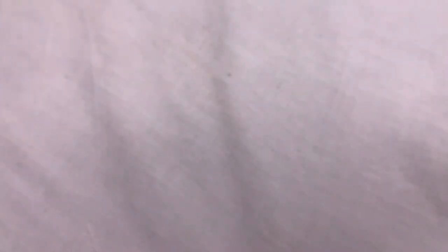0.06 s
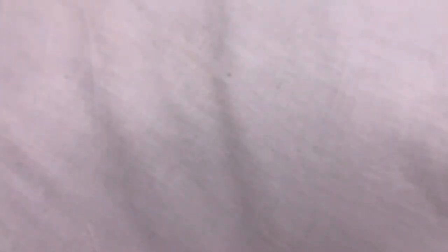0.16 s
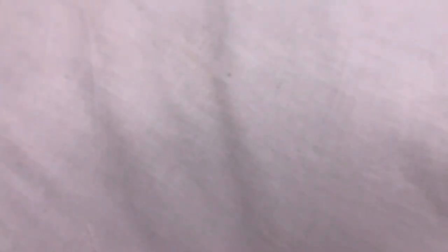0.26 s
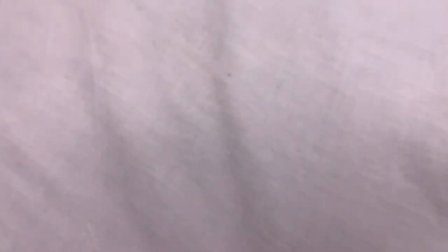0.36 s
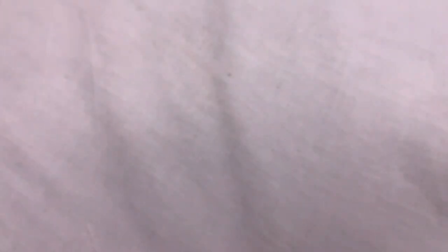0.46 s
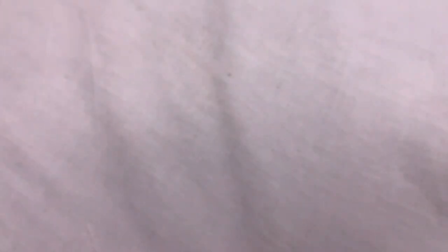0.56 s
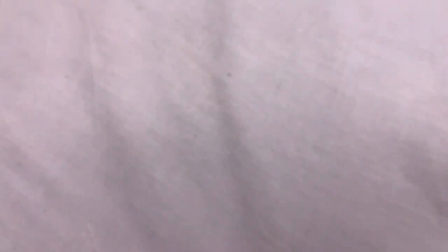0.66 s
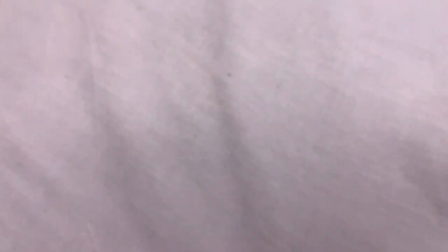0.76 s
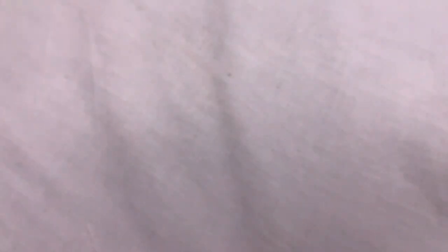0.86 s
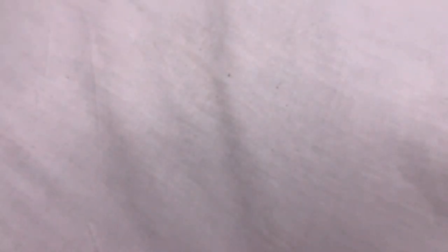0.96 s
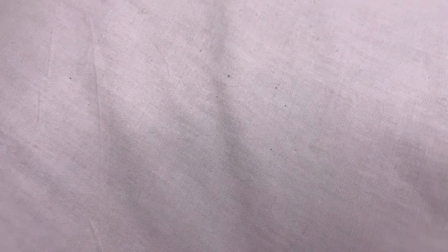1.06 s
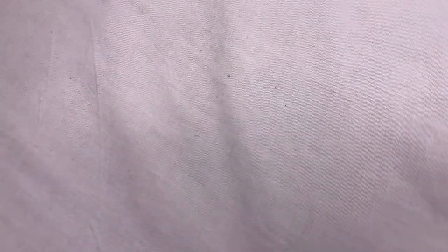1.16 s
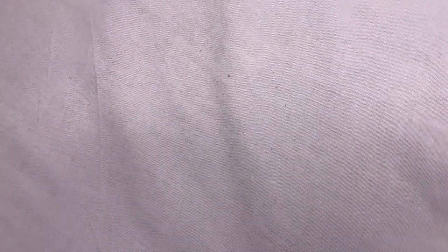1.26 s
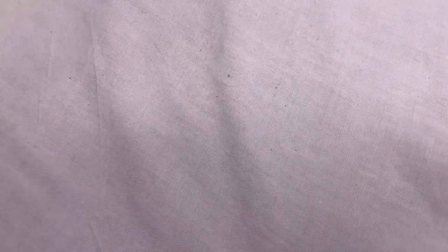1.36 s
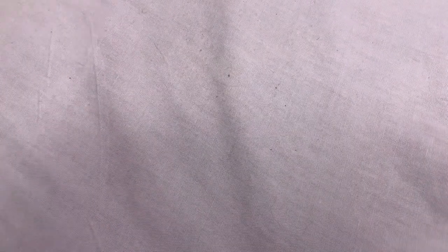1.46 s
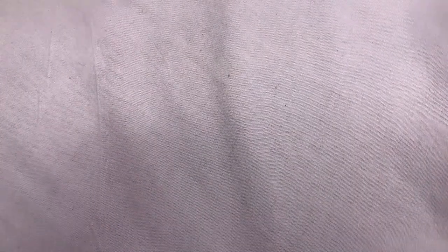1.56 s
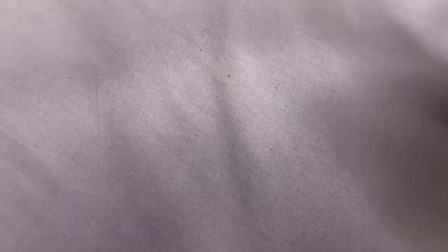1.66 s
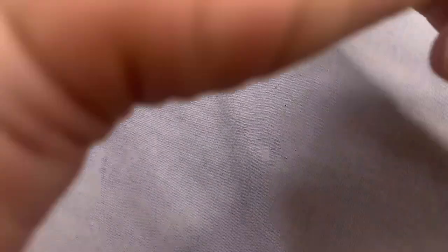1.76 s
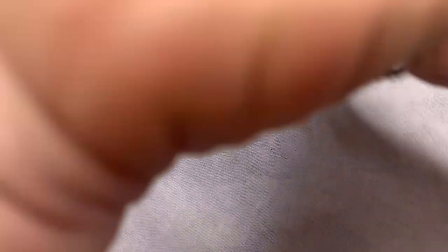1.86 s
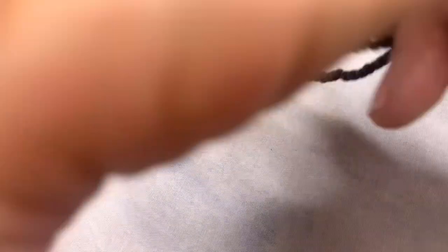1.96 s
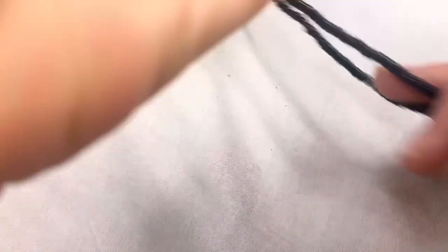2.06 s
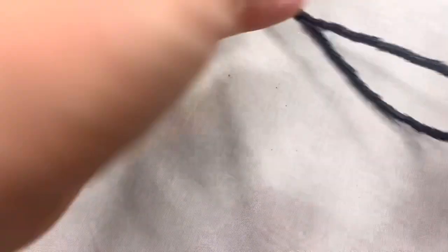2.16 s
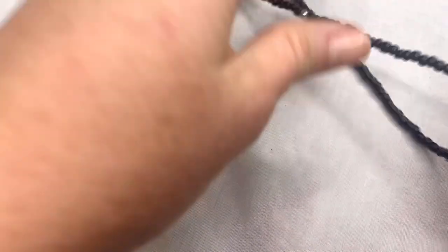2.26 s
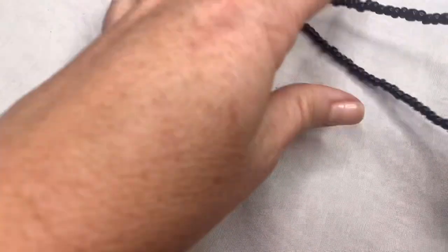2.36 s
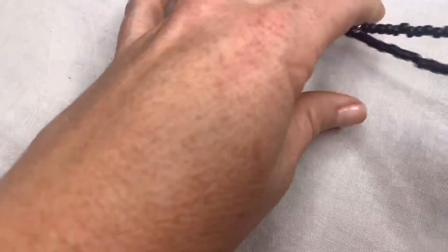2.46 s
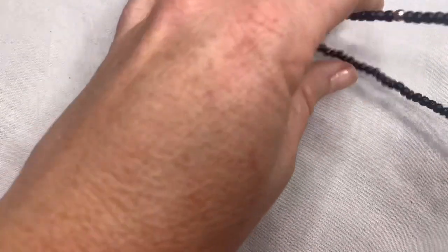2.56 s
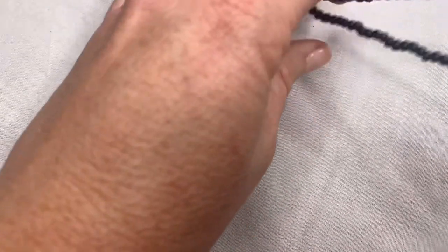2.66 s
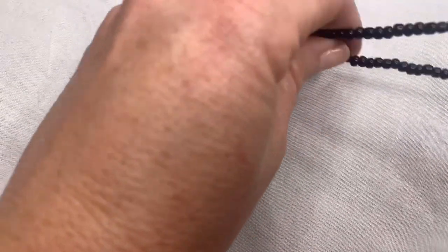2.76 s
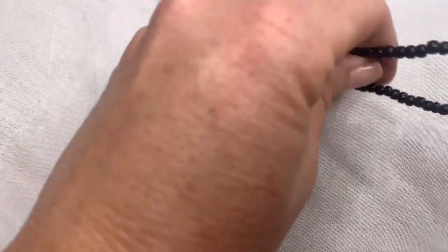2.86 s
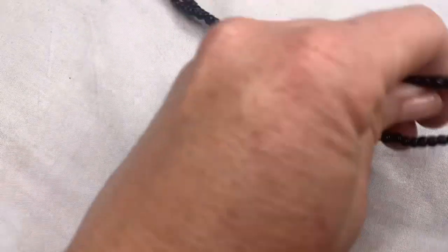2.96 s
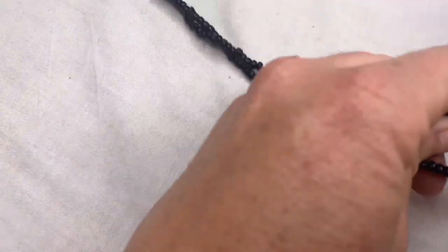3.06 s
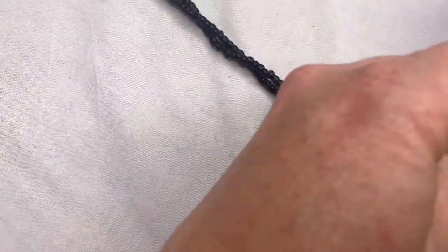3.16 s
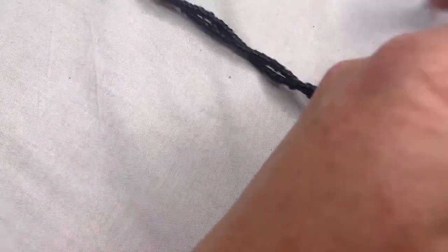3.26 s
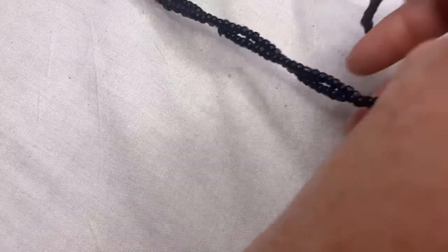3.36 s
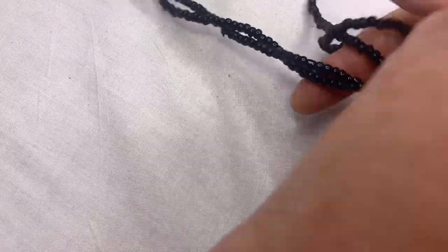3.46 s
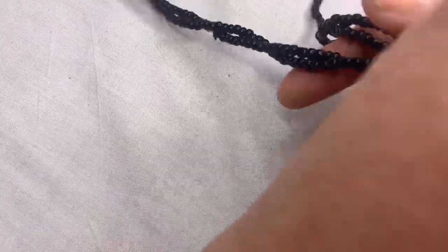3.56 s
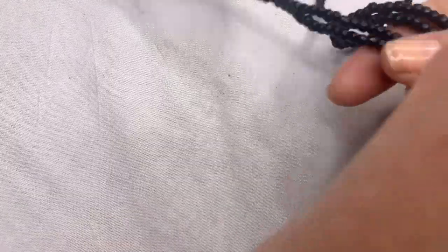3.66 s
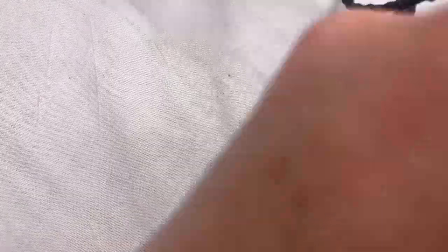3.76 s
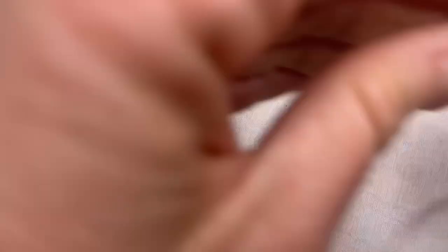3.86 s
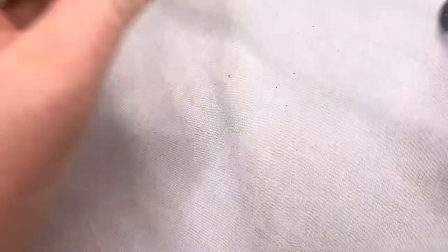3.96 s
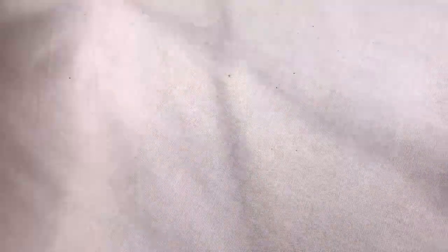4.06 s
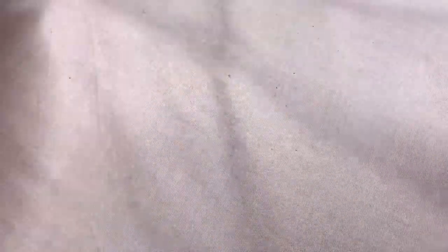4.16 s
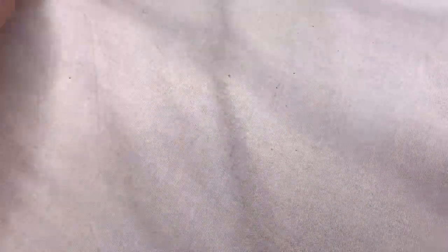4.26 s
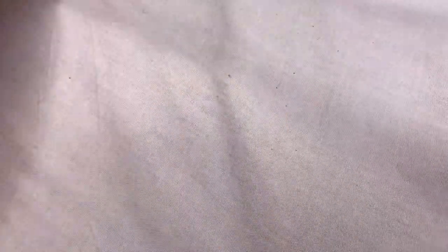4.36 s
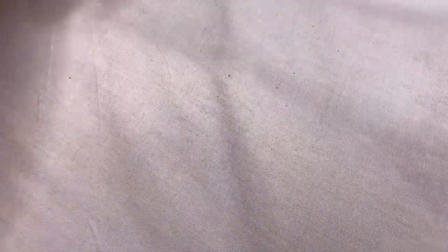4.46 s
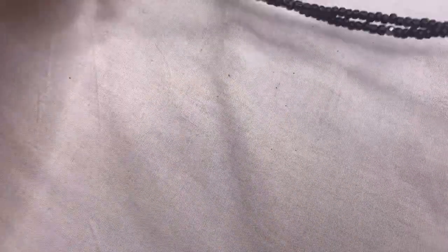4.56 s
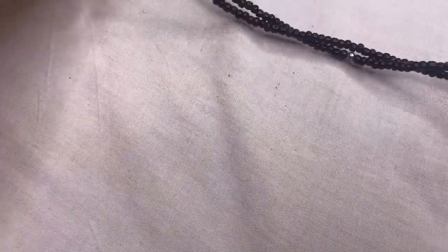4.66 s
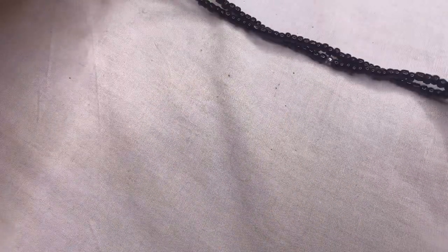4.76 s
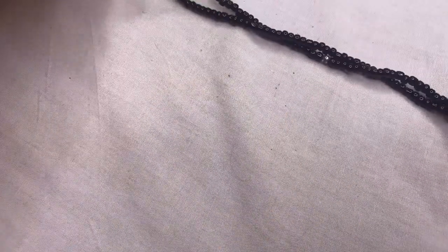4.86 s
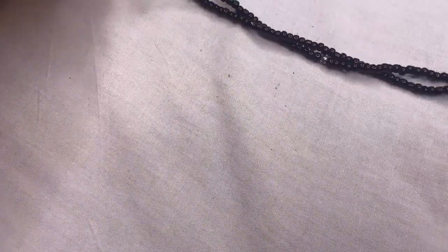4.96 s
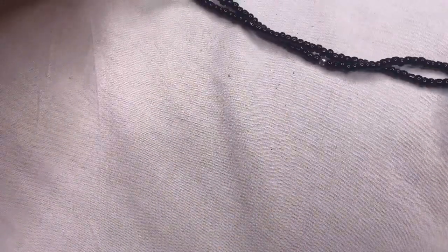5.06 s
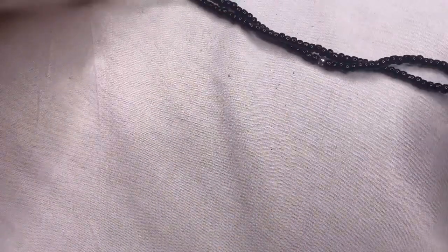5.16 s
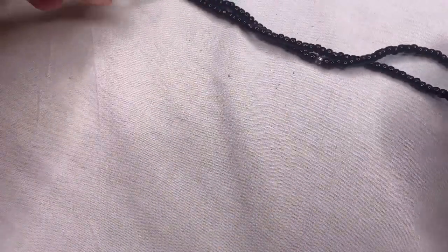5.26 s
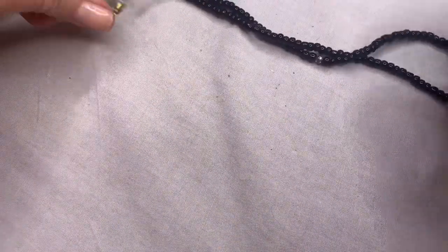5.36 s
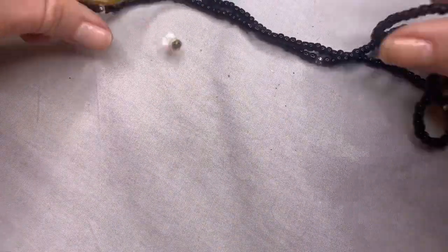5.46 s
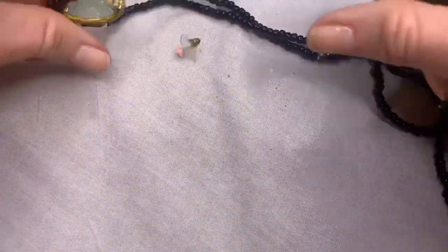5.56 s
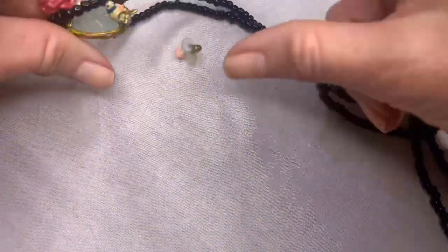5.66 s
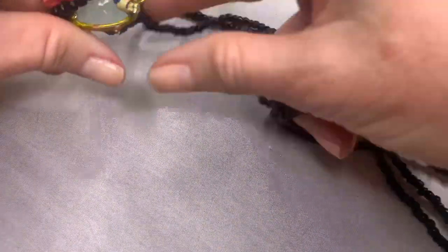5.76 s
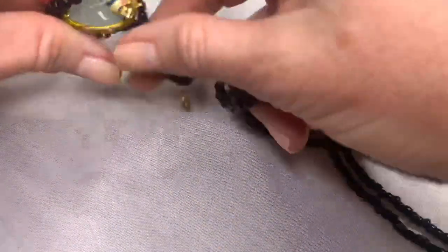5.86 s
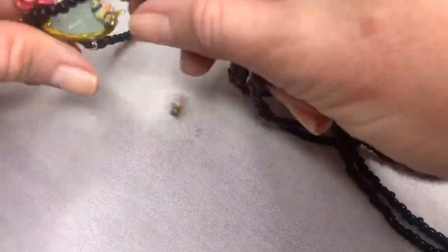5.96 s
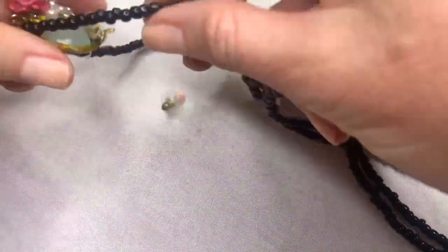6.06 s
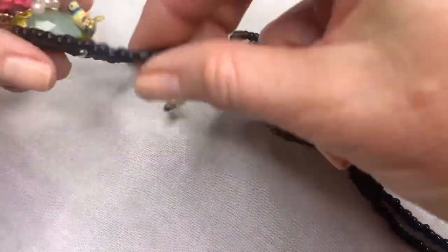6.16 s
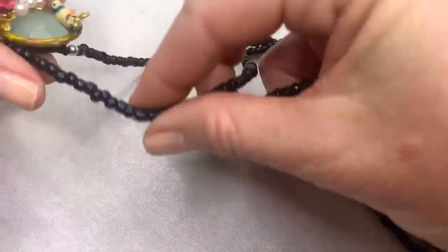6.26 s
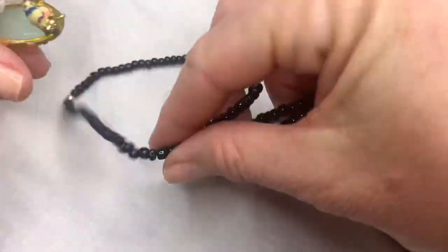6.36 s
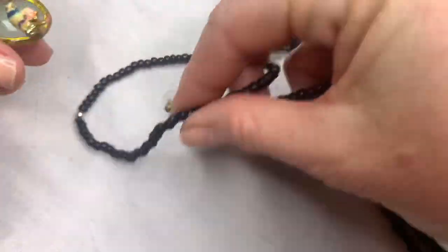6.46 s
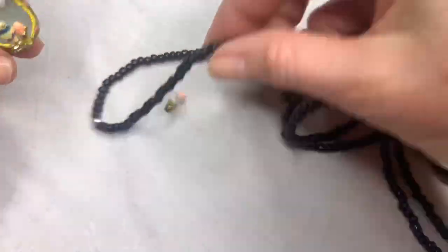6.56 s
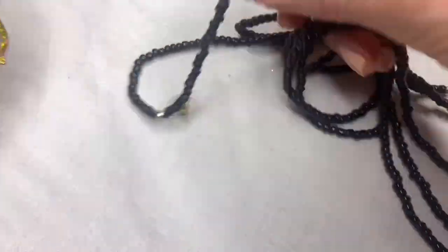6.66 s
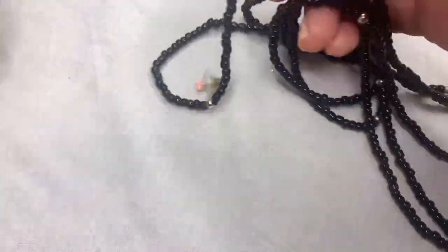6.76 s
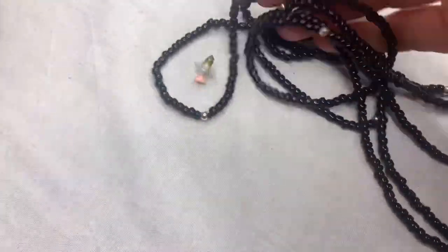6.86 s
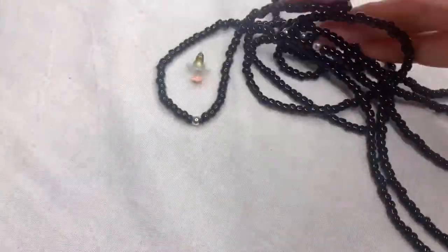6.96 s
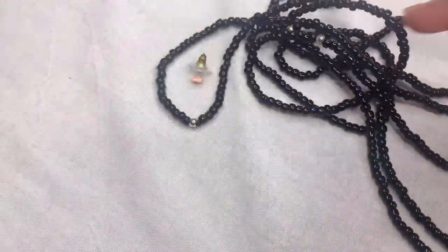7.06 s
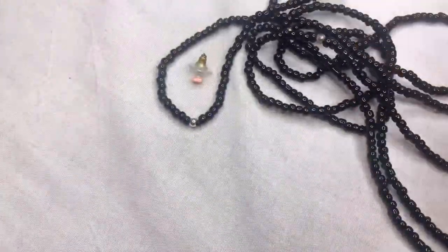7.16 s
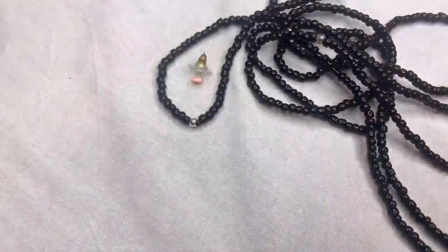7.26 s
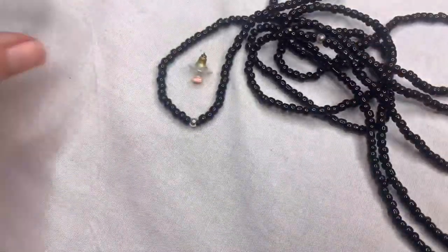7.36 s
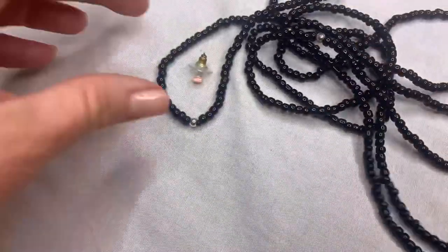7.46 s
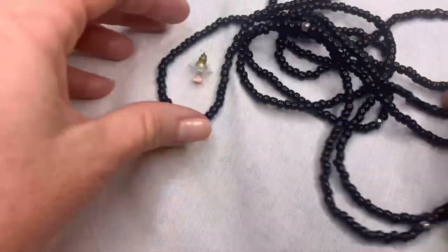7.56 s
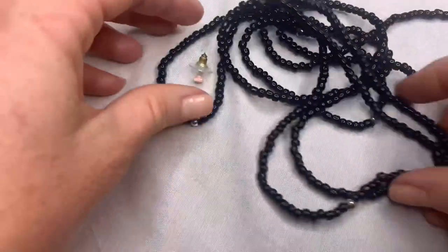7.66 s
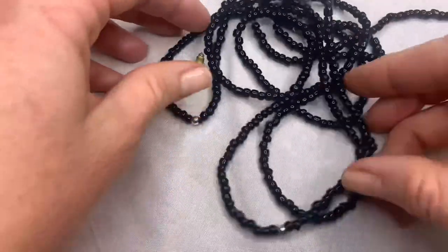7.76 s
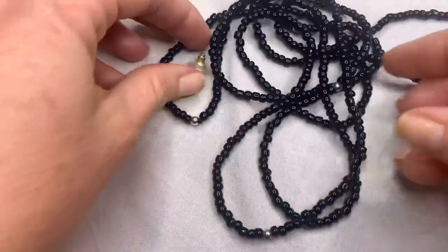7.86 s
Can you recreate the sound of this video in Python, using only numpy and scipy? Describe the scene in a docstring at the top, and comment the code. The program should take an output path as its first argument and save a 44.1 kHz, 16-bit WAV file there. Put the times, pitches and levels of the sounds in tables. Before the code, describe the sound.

Close up in a quiet room, bead strings slide, hiss and click as hands pull them from a jewelry box across cloth. After a few fingertip pats on the table, larger pieces knock the box and small metal ones ping briefly. The rubbing swells and fades with each stroke, drops to a short lull, then returns with scattered ticks, finishing with a rustle and several dull taps.

```python
"""Beads and skin rub on a cloth-covered table, close up, as fingertips thump its top and beads click. Hands
rummage in a jewelry box and draw out bead strings; the rubbing follows the speed of each stroke. Larger pieces
knock the box and ring its modes, a small metal piece pings now and then, beads tumble in short runs of ticks
and the box creaks once. It is heard in a quiet room on two channels whose phase differs by frequency."""
import sys
import numpy as np
from scipy import signal
from scipy.fft import rfft, irfft
from scipy.io import wavfile

SR = 44100
rng = np.random.default_rng(int(sys.argv[2]) if len(sys.argv) > 2 else 0)


def file_out(sig):
    """Save sig as 16-bit WAV at sys.argv[1]."""
    # one column per channel
    cols = np.atleast_2d(sig).T
    # limit, then scale
    lim = np.clip(cols, -1, 1)
    pcm = np.round(lim * 32767).astype(np.int16)
    wavfile.write(sys.argv[1], SR, pcm)


N = 348566
FREQ_HZ, TIME_S = np.fft.rfftfreq(N, 1 / SR), np.arange(N) / SR

# hand strokes: start_s, length_s, rise_share, beads_db, cloth_db, rumble_db
HAND_STROKES = [(0.074, 0.21, 0.39, -50.5, -53, -53), (0.208, 0.36, 0.12, -66, -68, -58.5),
                (0.449, 0.818, 0.81, -39, -48.5, -61), (1.551, 0.31, 0.76, -48, -54.5, -64),
                (1.855, 0.4, 0.48, -43, -46, -54.5), (2.319, 0.38, 0.19, -44, -49, -57),
                (2.587, 0.22, 0.72, -46, -48.5, -54.5), (2.764, 0.18, 0.69, -34, -41.5, -52),
                (2.913, 0.38, 0.072, -53.5, -54.5, -60), (3.078, 0.35, 0.085, -40.5, -44, -50.5),
                (3.408, 0.13, 0.25, -60, -59, -64.5), (3.573, 0.048, 0.55, -53, -63.5, -68),
                (3.628, 0.36, 0.56, -37, -44, -47), (3.936, 0.2, 0.66, -59, -59.5, -56.5),
                (4.149, 0.26, 0.36, -54, -54, -54), (4.38, 0.38, 0.11, -65, -69, -73),
                (4.647, 0.19, 0.34, -66.5, -89, -78), (5.042, 0.17, 0.25, -54, -74, -71),
                (5.201, 0.58, 0.12, -52.5, -64, -73), (5.419, 0.11, 0.35, -52, -56.5, -59.5),
                (5.582, 0.31, 0.23, -43, -50, -57), (5.857, 0.22, 0.28, -52.5, -64, -75.5),
                (6.23, 0.13, 0.093, -57, -61.5, -73), (6.334, 0.64, 0.54, -56, -67.5, -77.5),
                (6.789, 0.2, 0.29, -48.5, -59, -62.5), (6.926, 0.28, 0.31, -59.5, -69, -59.5),
                (7.157, 0.11, 0.4, -53, -55, -57.5), (7.197, 0.42, 0.19, -87, -86, -62.5),
                (7.361, 0.49, 0.62, -41.5, -55.5, -63.5)]
# rubbing spectra of beads, cloth and box: freq_hz, density_db
BEAD_SPECTRUM = [(1000, -41), (4000, -19), (6500, -12.5), (8700, 2), (10500, 2), (12000, 3), (14000, 7),
                 (15700, 4), (16400, -93)]
CLOTH_SPECTRUM = [(100, -42.5), (600, 0.5), (1700, -3), (3000, 2), (4500, 4.5), (7000, 4.5), (11000, 13.5),
                  (16000, -28)]
RUMBLE_SPECTRUM = [(25, -20.5), (55, 2.5), (112, 7.5), (155, 4), (225, 7.5), (340, -1), (470, -5.5),
                   (700, -14.5), (1020, -13.5), (1300, -20), (8000, -52.5)]

# fingertips on the table: start_s, level_db, boom_db, pitch_hz
FINGER_THUMPS = [(0.106, -45, -31, 392), (0.233, -34.5, -27, 408), (0.257, -39, -25, 398),
                 (0.286, -38.5, -16, 323), (0.334, -41, -22, 334), (0.415, -36, -18, 409),
                 (2.654, -47, 12.5, 129), (5.012, -49, 4, 443), (5.252, -31, -10.5, 488),
                 (7.486, -22.5, -39, 480), (7.512, -29.5, -1, 436), (7.68, -48, 14, 152),
                 (7.738, -42, 6.5, 474), (7.758, -33, -12, 182), (7.789, -35.5, -11, 225),
                 (7.846, -54, 12.5, 130)]
# finger pat modes: pitch_ratio, level_db, t60_s
PAT_MODES = [(.42, -7.5, 0.094), (.75, -9.5, 0.065), (1, 5, 0.036), (1.2, -5.5, 0.046)]
# table top modes: pitch_hz, level_db, t60_s
TABLE_MODES = [(61, -17, 0.7), (112.3, -2, 0.26)]

# distinct bead collisions: start_s, level_db, clack_db
BEAD_CLICKS = [(0.172, -34.5, -16), (1.782, -39, -5), (2.031, -27.5, -4), (2.26, -40, -12),
               (2.348, -35.5, -34), (2.6454, -37.5, -13.5), (2.759, -35.5, -37), (2.957, -32.5, -34),
               (3.4445, -40.5, -15), (3.656, -41, -27), (3.7034, -35, -9.5), (3.752, -35.5, -6),
               (3.881, -25, -15), (4.4377, -50, -11), (4.4616, -44, -8.5), (4.8555, -53, -11),
               (5.2084, -36, -26), (5.226, -38, -26), (5.2819, -42, -1), (5.3856, -42.5, 0),
               (5.6984, -39.5, -24), (5.7545, -35, -30), (5.878, -33.5, -27), (5.895, -43, -11),
               (5.9547, -42.5, -22), (5.9924, -31, -34.5), (6.0051, -37, -23), (6.2514, -27, -41),
               (6.5003, -47, -8), (6.547, -50, -10), (6.584, -43.5, -18), (6.5975, -51, -20),
               (6.6276, -46, -21), (6.636, -44.5, -14), (6.7033, -42.5, -32), (6.8841, -42, -24),
               (6.978, -49, -21), (7.093, -48.5, -10), (7.776, -33.5, -16)]
# bead snap modes: pitch_hz, level_db
SNAP_MODES = [(8000, -16), (10400, -7), (12000, -8.5), (14300, -5)]
# clack of larger beads: freq_hz, density_db
CLACK_SPECTRUM = [(1200, -26), (3000, -10), (5000, 2), (7300, 7.5), (10000, -13), (16000, -27.5)]

# pieces striking the box: start_s, level_db, hardness_hz, low_modes_db
BOX_KNOCKS = [(0.762, -37, 4640, 9), (1.163, -31.5, 1170, -2.5), (1.321, -55.5, 866, -13),
              (1.707, -46, 1100, 0), (1.757, -32.5, 1320, -2), (1.948, -48, 1020, 11),
              (2.029, -45.5, 5600, 13), (2.091, -42, 2300, -29), (2.106, -40.5, 1540, 2),
              (2.865, -43, 990, -16.5), (2.924, -25.5, 790, 8), (3.216, -46.5, 1600, -18),
              (3.2524, -39.5, 1120, -16), (3.280, -34, 1120, 7.5), (3.705, -41.5, 4600, 9.5),
              (3.753, -39, 4640, -3), (3.802, -24, 1120, 1.5), (3.867, -30, 4640, -9.5),
              (3.8779, -37.5, 3020, 1.5), (4.226, -47.5, 890, 9), (4.305, -47, 3250, 10.5),
              (5.12, -57, 1255, -10), (5.384, -36.5, 4460, -2), (5.643, -45, 1210, 21),
              (6.965, -39.5, 600, 10)]
# box modes: pitch_hz, level_db, t60_s
BOX_MODES = [(110, -13, .45), (227, -7, .15), (305, -4, .07), (428, -12, .16), (462, -11, .22),
             (556, -10, .18), (610, -9, .18), (688, -9, .15), (800, -10, .08), (975, 1.5, .085),
             (1470, -13, .08), (2070, -11, .08), (2500, -9, .08), (3520, -5, .05)]
# clatter of the box's contents: freq_hz, density_db
CLATTER_SPECTRUM = [(60, -36), (200, -1.5), (500, -10.5), (1100, -7), (2400, -6), (5000, -10.5),
                    (16000, -25.5)]
# partials of small metal pieces: start_s, level_db, pitch_hz, t60_s
PING_PARTIALS = [(0.764, -32.5, 2310, 0.044), (.764, -42, 3490, 0.049), (0.763, -39, 4440, 0.028),
                 (0.763, -42.5, 5820, 0.043), (2.03, -39, 6710, 0.067), (5.123, -60, 7530, 0.17),
                 (5.384, -34.5, 1488, 0.08), (5.388, -44, 2910, 0.035), (5.385, -43.5, 4900, 0.036),
                 (5.772, -43, 8850, 0.26), (5.824, -51, 11340, 0.12), (7.186, -42, 8740, 0.11)]
# beads toppling: start_s, length_s, level_db
BEAD_TUMBLES = [(2.64, 0.026, -37.5), (2.71, .018, -37.5), (3.277, .008, -31), (3.704, 0.0094, -32),
                (4.326, 0.013, -48.5), (4.575, 0.015, -54.5), (4.9511, 0.0085, -56.5), (5.445, .012, -47),
                (6.573, 0.007, -48), (6.83, 0.025, -44.5), (7.741, 0.0072, -49)]
# slips of the box's creak: start_s, level_db
CREAK_SLIPS = [(6.325, -51.5), (6.335, -54.5)]

# room reverberation: freq_hz, t60_s
ROOM_DECAY = [(100, 0.3), (2000, 0.17), (6000, 0.14), (15000, 0.013)]
# room background: freq_hz, density_db
ROOM_SPECTRUM = [(20, -10.5), (55, 6), (120, 0.5), (240, -4.5), (450, -11), (800, -17), (2000, -22),
                 (16000, -20.5)]
# likeness of the two ports: freq_hz, correlation
PORT_LIKENESS = [(100, .99), (350, 0.93), (900, 0.27), (3000, 0.1), (6000, 0.51), (8500, .99),
                 (16000, 0.85)]
# phase between the ports: freq_hz, left_lead_rad
PORT_PHASE = [(0, 0), (400, .1), (950, 1.4), (1800, 3.3), (4200, 6.8), (5300, 7.8), (6500, 6.2),
              (8600, 3.14), (11100, 0), (13400, -3.14), (15600, -6.2), (17000, -7)]
# balance of the ports: freq_hz, left_minus_right_db
PORT_BALANCE = [(300, -0.5), (650, 2.5), (1300, 0.5), (2500, 2.5), (3500, -1), (5600, -2), (7000, 0)]

BEND_S = .003  # bending-wave travel time in the box wall at 1 kHz


def amp(db):
    """Decibels to gain."""
    return 10 ** (np.asarray(db) / 20)


def unit(x):
    """Scales to rms 1."""
    return x / np.sqrt(np.mean(x ** 2) + 1e-20)


def read(points, hz):
    """Interpolates a table over log frequency."""
    point_hz, value = np.transpose(points)
    return np.interp(np.log(hz + 1), np.log(point_hz + 1), value)


def add(mix, start_s, sound):
    """Mixes a sound in at start_s."""
    part = mix[:, max(round(start_s * SR), 0):][:, :sound.shape[-1]]
    part += sound[..., :part.shape[-1]]


def butter(x, hz, kind, order=2):
    """Causal low-pass or high-pass."""
    return signal.sosfilt(signal.butter(order, min(hz, SR / 2 - 1), kind, fs=SR, output="sos"), x)


def shape(pair, spectrum):
    """Colours two independent signals and correlates them as the ports hear them."""
    hz, (left, other) = np.fft.rfftfreq(pair.shape[1], 1 / SR), rfft(pair)
    likeness = np.clip(read(PORT_LIKENESS, hz), 0, 1)
    right = likeness * left + np.sqrt(1 - likeness ** 2) * other
    return unit(irfft(np.array([left, right]) * amp(read(spectrum, hz)), pair.shape[1]))


def noise(spectrum, size=N):
    """Coloured stereo noise."""
    return shape(rng.standard_normal((2, size)), spectrum)


def wander(rate_hz):
    """Random drift, mostly below rate_hz, rms 1."""
    return unit(irfft(rfft(rng.standard_normal(N)) / (1 + (FREQ_HZ / rate_hz) ** 4), N))


def grains(per_s, spread_db, decay_s):
    """Tiny contacts of uneven size, each a decaying noise burst."""
    hits = (rng.random(N) < per_s / SR) * amp(spread_db * np.minimum(rng.exponential(1, N), 4))
    power = signal.lfilter([1], [1, -np.exp(-2 / (decay_s * SR))], hits ** 2)
    return np.sqrt(power) * rng.standard_normal((2, N))


def patches(x, depth_db, width_hz, length_s):
    """Each new contact point favours other pitches: brief spectral hills and dips."""
    frames = signal.stft(x, SR, nperseg=512, noverlap=384)[2]
    field = rng.standard_normal(frames.shape[1:])
    for axis, span in enumerate([width_hz * 512 / SR, length_s * SR / 128]):
        pole = np.exp(-1 / span)
        field = signal.filtfilt([1 - pole], [1, -pole], field, axis=axis, padtype="even")
    gain = unit(amp(depth_db * np.clip(unit(field), -2, 2)))
    return signal.istft(frames * gain, SR, nperseg=512, noverlap=384)[1][:, :N]


def stroke_envelope(levels_db, exponent, t60_s, max_ramp_s=.31):
    """The hand speeds up, holds and slows; rubbing follows a power of its speed, then dies away."""
    energy = np.zeros((1, N))
    for (start_s, length_s, rise_share, *_), db in zip(HAND_STROKES, levels_db):
        t, rise_share = np.arange(0, length_s, 1 / SR), np.clip(rise_share, .05, .95)
        rise_s = min(rise_share * length_s, max_ramp_s)
        fall_s = min((1 - rise_share) * length_s, max_ramp_s)
        speed = np.sin(np.pi / 2 * np.interp(t, [0, rise_s, length_s - fall_s, length_s], [0, 1, 1, 0]))
        add(energy, start_s, (amp(db) * speed ** exponent) ** 2)
    pole = amp(-60 / (t60_s * SR)) ** 2
    return np.sqrt(signal.lfilter([1 - pole], [1, -pole], energy[0] + 1e-14))


def through_box(x):
    """Rubbing is louder near the box's modes."""
    peaks = sum(1 / (1 + ((FREQ_HZ - hz) / (3 + .008 * hz)) ** 2) for hz, _, _ in BOX_MODES)
    return unit(irfft(rfft(x) * (.5 + peaks), N))


def rummaging(blur_from_db=-58, blur_span_db=25, single_jerk_db=3.0, glide_jerk_db=1.1):
    """Beads slide, cloth scrapes and the box rumbles under the hand's strokes and uneven push."""
    bead_db, cloth_db, rumble_db = np.transpose(HAND_STROKES)[3:]
    slide = stroke_envelope(bead_db, exponent=1.3, t60_s=.033)
    scrape = stroke_envelope(cloth_db, exponent=1.32, t60_s=.021)
    jostle = stroke_envelope(rumble_db, exponent=1, t60_s=.1)
    push = wander(rate_hz=44)
    ticks = shape(grains(per_s=150, spread_db=2.7, decay_s=.0006), BEAD_SPECTRUM)
    hiss = shape(grains(per_s=2200, spread_db=2.6, decay_s=.0004), BEAD_SPECTRUM)
    hiss = patches(hiss, depth_db=4, width_hz=120, length_s=.006)
    # a fast slide blurs single ticks into a steadier hiss
    blur = np.clip((20 * np.log10(slide) - blur_from_db) / blur_span_db, .03, .85)
    jerk_db = push * (single_jerk_db + (glide_jerk_db - single_jerk_db) * blur)
    beads = (np.sqrt(blur) * hiss + np.sqrt(1 - blur) * ticks) * slide * amp(jerk_db - 6.5)
    cloth = shape(grains(per_s=4000, spread_db=1.5, decay_s=.0005), CLOTH_SPECTRUM)
    cloth = cloth * scrape * amp(jerk_db - 6)
    rumble = shape(grains(per_s=300, spread_db=-.5, decay_s=.029), RUMBLE_SPECTRUM)
    rumble = through_box(rumble) * jostle * amp(2 * push)
    return beads + patches(cloth, depth_db=3.8, width_hz=70, length_s=.009) + rumble


def finger_thumps():
    """A padded fingertip gives a short hollow note; the table top shudders and booms after it."""
    out, t = np.zeros((2, N)), TIME_S[:SR // 3]
    touch, swell = 1 - np.exp(-(t / .005) ** 2), 1 - np.exp(-t / .018)
    for start_s, level_db, boom_db, pitch_hz in FINGER_THUMPS:
        rad_per_hz = 2 * np.pi * t * rng.uniform(.96, 1.04)
        pat = sum(amp(db - 60 * t / t60_s) * np.sin(ratio * pitch_hz * rad_per_hz)
                  for ratio, db, t60_s in PAT_MODES)
        boom = sum(amp(db - 60 * t / t60_s) * np.sin(hz * rad_per_hz) for hz, db, t60_s in TABLE_MODES)
        shudder = noise(RUMBLE_SPECTRUM, len(t)) * amp(-12 - 60 * t / .07)
        add(out, start_s, amp(level_db) * ((pat + shudder) * touch + amp(boom_db) * boom * swell))
    return out


def bead_clicks():
    """Hard beads meet: a bright snap, a deeper clack and a short rattle of the neighbours."""
    out, t = np.zeros((2, N)), TIME_S[:SR // 25]
    hz, mode_db = np.transpose(SNAP_MODES)[:, :, None]
    attack = 1 - np.exp(-t / .0003)
    for start_s, level_db, clack_db in BEAD_CLICKS:
        bead_hz = hz * rng.uniform(.821, 1.132, hz.shape)  # no two beads are alike
        modes = amp(mode_db) * np.sin(2 * np.pi * (bead_hz * t + rng.random(hz.shape)))
        snap = unit(modes.sum(0)) * np.exp(-t / .00084)
        clack = noise(CLACK_SPECTRUM, len(t)) * amp(clack_db - 6) * np.exp(-t / .0016)
        rattle = noise(BEAD_SPECTRUM, len(t)) * amp(-19) * np.exp(-t / .003)
        click = butter((snap + clack + rattle) * attack, 2400, "high", order=4)
        onset_rms = np.sqrt(np.mean(click[:, :SR // 250] ** 2))
        add(out, start_s, amp(level_db - 3.5) * click / onset_rms)
    return out


def box_blow(hardness_hz, low_modes_db, grip_detune=.008, push_db=38):
    """A blow bends the box wall, rings it and rattles the contents; a soft one lacks treble."""
    t = TIME_S[:SR // 3]
    hz, db, t60_s = np.transpose(BOX_MODES)[:, :, None]
    hz = hz * (1 + grip_detune * rng.standard_normal(hz.shape))
    spot_db = 2 * rng.standard_normal(hz.shape)  # each spot favours other modes
    mode_db = db + spot_db + low_modes_db / (1 + (hz / 450) ** 4)
    modes = amp(mode_db - 60 * t / t60_s) * np.sin(2 * np.pi * (hz * t + rng.random(hz.shape)))
    clatter = noise(CLATTER_SPECTRUM, len(t)) * (amp(5 - 60 * t / .05) + amp(-5 - 60 * t / .26))
    push = amp(push_db) * butter(signal.unit_impulse(len(t)), 900, "low", order=1)
    blow = butter(push + modes.sum(0) + clatter, 90, "high")
    blow = butter(blow, hardness_hz, "low", order=6) + amp(-16.5) * butter(blow, 2 * hardness_hz, "low")
    # bending waves: lower pitches arrive later
    lag_rad = 4 * np.pi * BEND_S * np.sqrt(1000 * np.fft.rfftfreq(len(t), 1 / SR))
    blow = irfft(rfft(blow) * np.exp(-1j * lag_rad), len(t))
    onset_rms = np.sqrt(np.mean(blow[:, :SR // 50] ** 2))
    return blow / onset_rms


def box_knocks():
    """Larger pieces strike the box."""
    out = np.zeros((2, N))
    for start_s, level_db, hardness_hz, low_modes_db in BOX_KNOCKS:
        add(out, start_s - BEND_S / 2, amp(level_db - 6.5) * box_blow(hardness_hz, low_modes_db))
    return out


def metal_pings():
    """Small metal pieces ring briefly on their own partials."""
    out, t = np.zeros((2, N)), TIME_S[:SR // 3]
    for start_s, level_db, hz, t60_s in PING_PARTIALS:
        attack = 1 - np.exp(-t * hz / 2)
        add(out, start_s, amp(level_db - 60 * t / t60_s) * np.sin(2 * np.pi * hz * t) * attack)
    return out


def bead_tumbles():
    """Beads topple onto their neighbours: brief, dense runs of ticks."""
    out = np.zeros((2, N))
    ticks = shape(grains(per_s=900, spread_db=2, decay_s=.0004), BEAD_SPECTRUM)
    for start_s, length_s, level_db in BEAD_TUMBLES:
        run = ticks[:, round(start_s * SR):round((start_s + length_s) * SR)]
        add(out, start_s, amp(level_db - 2.5) * unit(run * np.linspace(1, .5, run.shape[1])))
    return out


def box_creak():
    """The box creaks in two slips, each a faint blow to its wall."""
    out = np.zeros((2, N))
    for start_s, level_db in CREAK_SLIPS:
        add(out, start_s - BEND_S, amp(level_db - 10) * box_blow(hardness_hz=1400, low_modes_db=-9))
    return out


def room_reverb(x):
    """Diffuse reflections; the treble dies first."""
    hz, t, frames = signal.stft(rng.standard_normal((2, SR // 2)), SR, nperseg=256)
    decay = amp(-60 * t / read(ROOM_DECAY, hz)[:, None]) * (t > .005)
    tail = signal.istft(frames * decay, SR, nperseg=256)[1]
    return signal.fftconvolve(x, tail / np.linalg.norm(tail[0]), axes=1)[:, :N]


def scene():
    """Close handling sounds, their reflections and the quiet room."""
    box = box_knocks() + box_creak()
    bright = bead_clicks() + bead_tumbles() + metal_pings()
    rubbing, thumps = rummaging(), finger_thumps()
    send = amp(-19) * rubbing + amp(-14) * thumps + amp(-15) * bright + amp(-12) * box
    return rubbing + thumps + bright + box + room_reverb(send) + amp(-72.5) * noise(ROOM_SPECTRUM)


def record(dry):
    """The two channels differ in phase and level, differently at each frequency; a low-pass limits the band."""
    lead_rad = np.interp(FREQ_HZ, *np.transpose(PORT_PHASE))
    left_gain = amp(read(PORT_BALANCE, FREQ_HZ) / 2) * np.exp(1j * lead_rad / 2)
    pair = irfft(rfft(dry) * np.array([left_gain, 1 / left_gain]), N)
    low_pass = signal.firwin(255, cutoff=16600, window=("kaiser", 8), fs=SR)
    return signal.oaconvolve(pair, low_pass[None], "same")


dry = scene()
out = record(dry)
file_out(out)
```